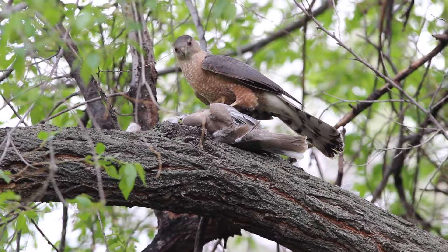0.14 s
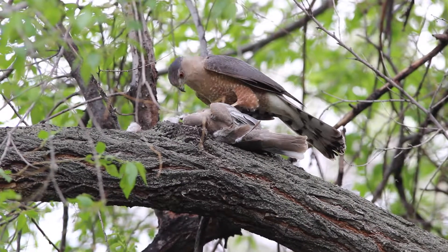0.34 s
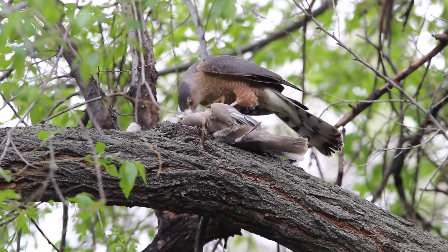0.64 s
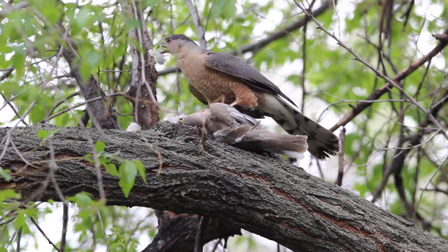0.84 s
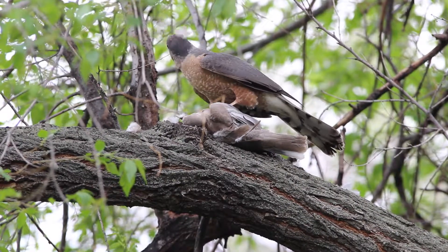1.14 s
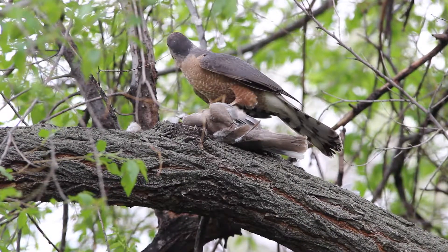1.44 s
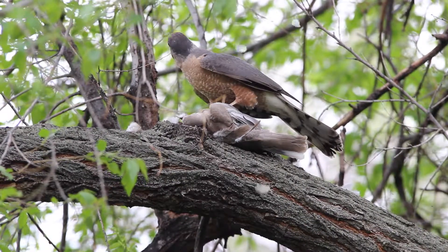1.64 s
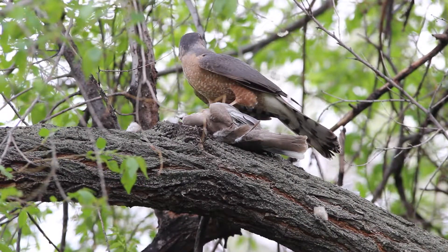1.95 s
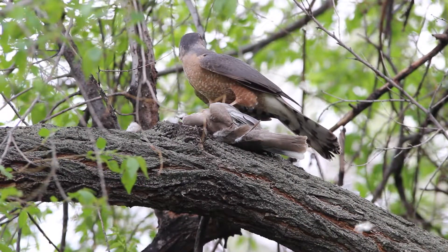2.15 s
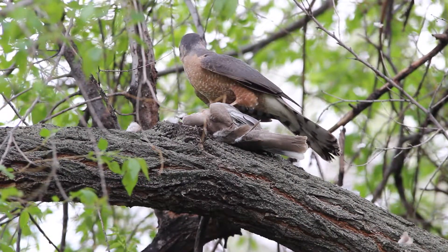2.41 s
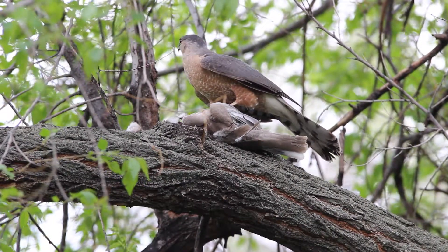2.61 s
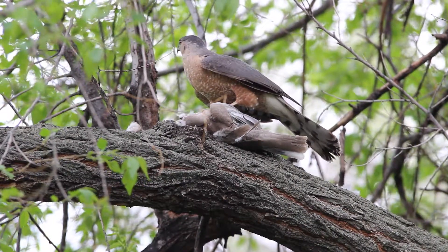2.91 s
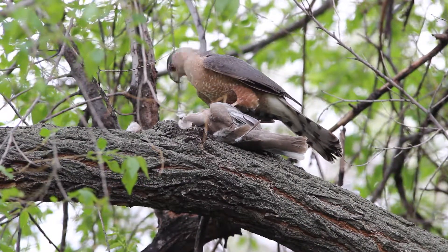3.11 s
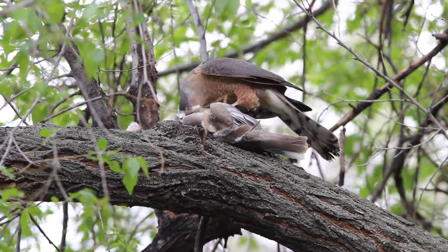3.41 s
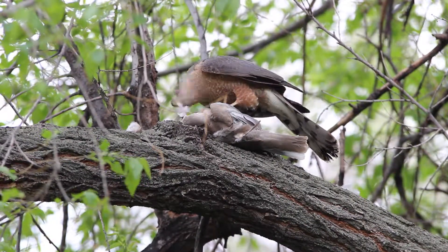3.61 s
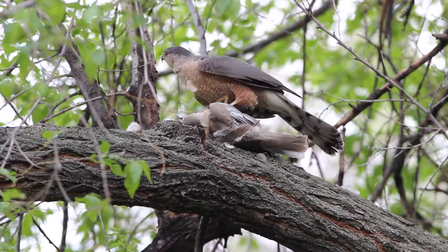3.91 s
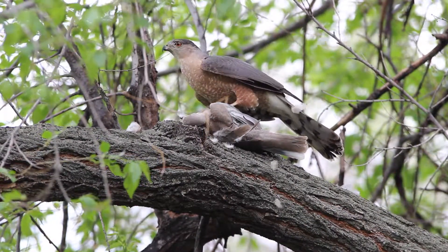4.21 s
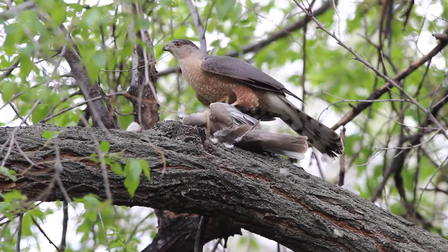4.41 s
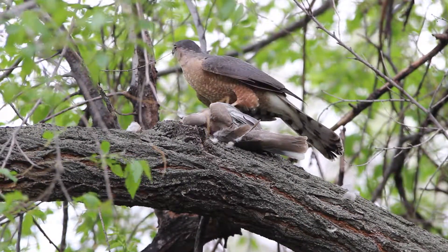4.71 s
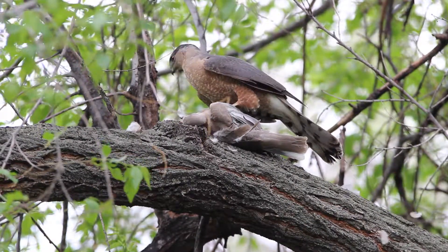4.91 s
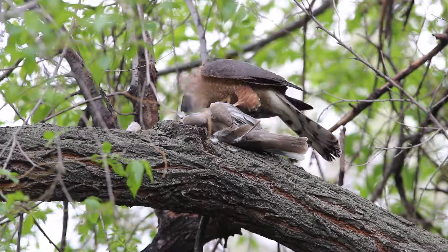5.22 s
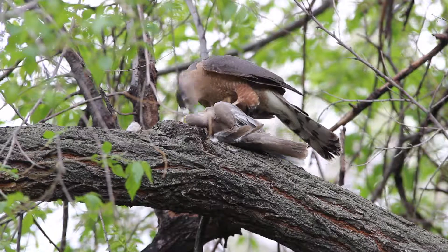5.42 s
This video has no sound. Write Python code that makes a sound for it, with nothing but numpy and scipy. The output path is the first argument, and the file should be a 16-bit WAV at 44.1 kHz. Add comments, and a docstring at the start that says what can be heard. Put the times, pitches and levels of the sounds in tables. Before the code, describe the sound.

In a wood, a small bird chirps faintly far off, and a hawk makes a few soft ticks plucking feathers. Then several nearby jays scold with harsh, nasal calls that overlap and break into rasps. They pause for about a second, leaving only distant chirps, then return in a denser bout, ending with the loudest call. A faint, low town rumble continues underneath.

```python
"""In a wood, several jays scold a hawk from the trees, their harsh calls overlapping in bouts.
Each call scoops up, holds a nasal tone, sags and breaks into a rasp as the syrinx passes through
period doubling into chaos; throat and bill filter it. A small bird chirps far off and the hawk
plucks its prey. Leaves and trunks scatter these sounds into echoes, over a low, distant town rumble."""
import sys
import numpy as np
from scipy import signal
from scipy.fft import rfft, irfft, next_fast_len
from scipy.io import wavfile
from scipy.ndimage import map_coordinates

SR = 44100
rng = np.random.default_rng(int(sys.argv[2]) if len(sys.argv) > 2 else 0)


def int16_out(signal):
    """Quantize to a 16-bit WAV file."""
    q = np.round(np.clip(np.atleast_2d(signal).T, -1, 1) * 32767)
    wavfile.write(sys.argv[1], SR, q.astype(np.int16))


N = 244752

# Spectrum of the distant town and the leaves. Each row: frequency in Hz, relative density in dB.
BACKGROUND_SPECTRUM = [(15, -53), (25, -23), (58, -3), (107, 0), (178, -2), (267, -6.5), (523, -5),
                       (598, -6), (895, -5.5), (1270, -10.5), (1450, -15), (2120, -24.5), (2850, -27),
                       (6730, -37), (15500, -40.5)]
# The far songbird. Each row: start in seconds, length in seconds, first pitch in Hz,
# last pitch in Hz, source level in dB.
SONGBIRD_CHIRPS = [(.16, .007, 6040, 5050, -47), (.258, .042, 4450, 3950, -52),
                   (0.253, 0.04, 3900, 2850, -50.5), (0.294, .07, 2090, 2450, -54.5),
                   (0.357, 0.047, 3900, 2840, -51.5), (0.84, 0.066, 3200, 3290, -54),
                   (0.914, 0.059, 3060, 2830, -54), (2.999, 0.028, 3840, 2620, -37),
                   (3.397, 0.045, 4800, 3350, -49), (3.47, 0.048, 3030, 2640, -49.5),
                   (3.87, .05, 4100, 2700, -52), (3.934, .08, 2970, 2680, -50)]
# The hawk's bill tugging at feathers. Each row: start in seconds, level before filtering in dB.
FEATHER_TUGS = [(0.196, -49), (0.634, -47), (.918, -53), (1.208, -50), (1.26, -50)]
# The jays' calls. Each row: start, length and time to the crest in seconds, crest and final pitch in Hz,
# exponent of the sag (1 is straight), tone level at the crest before filtering in dB, its change by the
# end in dB, roughness of the held tone (0-1), rasp level in dB, raspy share of the call (0-1),
# treble gain in dB as the bird faces towards or away.
JAY_CALLS = [ (1.578, .340, 0.05, 1603, 1420, .92, -15.5, -8, .025, -21, 0.53, -1),
             (1.613, 0.37, 0.072, 1596, 1420, 1.2, -10.5, -6, .025, -18.5, 0.42, -2),
             (2.116, 0.31, 0.024, 1621, 1472, 0.87, -11.5, -1, 0, -22.5, 0.3, -1.5),
             (2.35, .370, 0.06, 1614, 1400, 1.25, -12, -2.5, 0.05, -24.5, 0.33, 2),
             (2.411, 0.32, 0.071, 1652, 1420, 1.28, -23.5, 3, 0.02, -27.5, 0.52, 0.5),
             (2.653, 0.3, .035, 1617, 1475, 1.26, -11, -3.5, .02, -19, 0.49, -3.5),
             (4.122, 0.36, 0.086, 1537, 1405, 1.96, -19, -6, .02, -24.5, .50, 4.5),
             (4.195, 0.35, .057, 1617, 1340, 1.85, -11, -5, .015, -22.5, 0.35, 5),
             (4.512, 0.28, 0.044, 1595, 1435, 0.97, -20, 4, 0.03, -20, 0.42, -3.5),
             (4.674, .320, .056, 1563, 1370, 1.6, -19, -2.5, 0.06, -27.5, 0.47, 1),
             (4.846, 0.38, .068, 1664, 1490, 1.15, -14.5, -13, 0.13, -28, 0.22, -6),
             (5.009, 0.35, .062, 1605, 1270, 1.59, -11.5, -3, .02, -17.5, 0.47, 3),
             (5.039, 0.31, 0.067, 1647, 1440, 1.2, -18.5, -14, 0.03, -22, 0.48, -1),
             (5.343, .350, 0.08, 1575, 1275, 1.5, -20.5, 0, 0.02, -20, .35, 2),
             (5.419, .350, 0.086, 1658, 1420, 1.2, -13.5, 17, 0.08, -15, .35, -5.5), ]
# Response of the throat while the bill is still opening. Each row: frequency in Hz, gain in dB.
OPENING_BILL_RESPONSE = [(1200, -30), (2350, -17), (3200, -16.5), (4100, -20.5), (4750, 1), (5400, -18),
                         (6200, -12.5), (7200, -20), (9000, -34), (15500, -34)]
# Response of the throat and open bill. Each row: frequency in Hz, gain in dB.
OPEN_BILL_RESPONSE = [(800, -40.5), (1550, -27.5), (2350, -23.5), (2750, -13), (3000, -1.5), (3250, -3.5),
                      (3800, -24), (4750, -19), (5500, -26.5), (6300, -25.5), (7100, -25), (8600, -34.5),
                      (12000, -40.5), (15500, -50)]
# Spectrum of the rasp. Each row: frequency in Hz, relative density in dB.
RASP_SPECTRUM = [(800, -67), (1400, -12), (1950, -19), (2300, -7.5), (2550, -11), (2800, 0), (3200, -5.5),
                 (3600, 3), (4900, -10), (6500, -7.5), (7800, -18), (9900, -26), (12600, -24), (15500, -43)]
# Scatter from leaves, trunks and the deep wood. Each row: level before filtering in dB,
# time to decay by 60 dB in seconds, low-pass cutoff in Hz.
SCATTER_LAYERS = [(-10, 0.31, 10700), (-15, 0.54, 7400), (-27, 1.9, 3320)]

BACKGROUND_DB, TOP_HZ = -38.5, 15800
CLIMB_HZ_PER_S2, SWELL_DB = 16070, 5.5  # parabolic rise of a call to its crest
ONSET_ROUGHNESS, CLEARING_S = 0.19, 0.018
BREAK_SHARE, BREAK_POWER = 0.69, 1.36  # share of the raspy part taken to break up fully; its steepening


def undb(db):
    """Amplitude ratio of a level in decibels."""
    return 10 ** (np.asarray(db) / 20)


def unit_rms(x):
    """Normalisation to an rms of 1."""
    return x / np.sqrt(np.mean(x ** 2))


def gain_at(hz, spectrum):
    """Gain of a (Hz, dB) spectrum, interpolated on a log-frequency axis."""
    points, db = np.transpose(spectrum)
    return undb(np.interp(np.log(np.maximum(hz, 1)), np.log(points), db))


def filtered(x, spectrum):
    """Zero-phase filtering by a (Hz, dB) spectrum."""
    size = next_fast_len(len(x))
    return irfft(rfft(x, size) * gain_at(np.fft.rfftfreq(size, 1 / SR), spectrum), size)[:len(x)]


def drift(size, rate):
    """Smooth random modulation of spread near 1, through `rate` knots a second."""
    knots = rng.standard_normal(4096)
    return map_coordinates(knots, [np.arange(size) * rate / SR], order=3, mode="wrap")


def add(track, start, x):
    """Superposition of x on the track from a start in seconds."""
    i = max(int(start * SR), 0)
    track[i:i + len(x)] += x[:max(N - i, 0)]


def town_and_leaves(swell_db=0.45, flutter_db=1.0):
    """Broadband noise, lightly modulated in amplitude: a far rumble and a faint hiss of leaves."""
    noise = unit_rms(filtered(rng.standard_normal(N), BACKGROUND_SPECTRUM))
    return noise * undb(BACKGROUND_DB + swell_db * drift(N, 1.14) + flutter_db * drift(N, 14))


def songbird(waver=0.014):
    """Frequency modulation: each thin whistle is a sinusoid on a wavering exponential glide."""
    out = np.zeros(N)
    for start, length, from_hz, to_hz, db in SONGBIRD_CHIRPS:
        size = int(length * SR)
        hz = np.geomspace(from_hz, to_hz, size) * (1 + waver * drift(size, 157))
        whistle = np.sqrt(2) * np.sin(2 * np.pi * np.cumsum(hz) / SR)
        add(out, start, undb(db) * signal.windows.tukey(size, .5) * whistle)
    return out


def wood_echoes(x, build_s=0.0044):
    """Reverberation by scattering from trees: each layer is fainter, longer and duller than the last."""
    t = np.arange(SR) / SR
    response = 0
    for db, t60, cutoff_hz in SCATTER_LAYERS:
        tail = rng.standard_normal(SR) * np.exp(-np.log(1000) * t / t60) * np.minimum(t / build_s, 1)
        lowpass = signal.butter(1, cutoff_hz, fs=SR, output="sos")
        response = response + undb(db) * signal.sosfilt(lowpass, unit_rms(tail) / np.sqrt(SR))
    return signal.fftconvolve(x, response)[:N]


def hawk_plucks(decay_s=.009, band_hz=(2000, 11000)):
    """Damped transients: each rip of feathers is a burst of band-limited noise."""
    out, t = np.zeros(N), np.arange(SR // 10) / SR
    for start, db in FEATHER_TUGS:
        add(out, start, undb(db) * np.exp(-t / decay_s) * rng.standard_normal(len(t)))
    return signal.sosfilt(signal.butter(1, band_hz, "band", fs=SR, output="sos"), out)


def call_contours(t, length, crest_s, crest_hz, final_hz, bend, crest_db, change_db, held_rough, raspy):
    """Vocal effort sets pitch, level and roughness: a call climbs to a crest, sags and breaks up."""
    to_crest = np.maximum(crest_s - t, 0)
    spent = np.maximum(t - crest_s, 0) / (length - crest_s)
    hz = crest_hz - CLIMB_HZ_PER_S2 * to_crest ** 2 - (crest_hz - final_hz) * spent ** bend
    db = crest_db - SWELL_DB * (to_crest / crest_s) ** 2 + change_db * spent
    broken = np.clip((t / length - 1 + raspy) / (raspy * BREAK_SHARE), 0, 1) ** BREAK_POWER
    rough = np.clip(held_rough + ONSET_ROUGHNESS * np.exp(-t / CLEARING_S) + broken, 0, 1)
    return hz, db, rough


def nasal_tone(t, hz, phase, db, rough, opening, split_s=0.012, hoarse=0.16, flicker_db=3.0,
               overtone_slope=0.31, full_db=-14, quarter_db=-7,
               shrill_hz=4780, shrill_width_hz=300, shrill_db=5, shrill_s=0.04):
    """Source and filter: throat and bill resonances weight the partials of a period-doubled syrinx."""
    opened = 1 - opening
    # softer calls lose more of the main resonance than of their overtones
    overtones = undb(overtone_slope * (full_db - db))
    doubling = 1 - np.exp(-(t / split_s) ** 2)
    tone = 0
    for k in np.arange(1, 25):  # multiples of half the pitch
        partial_hz = hz * k / 2
        gain = gain_at(partial_hz, OPEN_BILL_RESPONSE) ** opened
        gain *= gain_at(partial_hz, OPENING_BILL_RESPONSE) ** opening
        # a shrill upper resonance stands out while the bill is widest
        shrill = np.exp(-(t / shrill_s) ** 2 - ((partial_hz - shrill_hz) / shrill_width_hz) ** 2)
        gain *= undb(shrill_db * opened * shrill)
        offset = 2 * np.pi * rng.random()
        if k != 4:  # away from the main resonance the partials flicker and turn hoarse
            gain *= (overtones * undb(flicker_db * drift(len(t), 30.1))) ** opened
            offset += hoarse * k * np.sqrt(rough) * drift(len(t), 450)
        tone += gain * np.sin(phase * k / 2 + offset) * (doubling if k % 2 else 1)
    # a second doubling adds quarter-pitch sidebands as the tone breaks
    return np.sqrt(2) * tone * (1 + undb(quarter_db) * np.sqrt(rough) * np.cos(phase / 4))


def membrane_rasp(phase, pulsing=0.76, sputter_db=-2.0, swing=3.0):
    """Chaotic vibration: the membranes' uneven slaps are noise pulsed at half pitch, limited in swing."""
    slaps = rng.standard_normal(len(phase)) * (1 + pulsing * np.cos(phase / 2))
    slaps *= undb(sputter_db * drift(len(phase), 350))
    rasp = unit_rms(filtered(slaps, RASP_SPECTRUM))
    envelope = np.abs(signal.hilbert(rasp))
    return unit_rms(rasp / np.sqrt(1 + (envelope / swing) ** 2))


def jay_call(length, crest_s, crest_hz, final_hz, bend, crest_db, change_db, held_rough, rasp_db, raspy,
             scoop=.23, scoop_s=.012, opening_s=0.022, attack_s=0.0023, release_s=0.0058,
             waver=0.0021, tremble=0.0043, jitter=.028, crack=.02, breakup=0.83):
    """Nonlinear oscillation: the syrinx slides up to pitch, doubles its period twice and turns chaotic."""
    t = np.arange(int(length * SR)) / SR
    hz, db, rough = call_contours(t, length, crest_s, crest_hz, final_hz, bend,
                                  crest_db, change_db, held_rough, raspy)
    opening = np.exp(-(t / opening_s) ** 2)  # falls from 1 to 0 as the bill opens
    hz *= 1 - scoop * np.exp(-(t / scoop_s) ** 2)
    # uneven cycles crack the onset and blur the high overtones first
    unevenness = tremble + jitter * rough + crack * opening
    hz *= 1 + waver * drift(len(t), 121.1) + unevenness * drift(len(t), 1100)
    phase = 2 * np.pi * np.cumsum(hz) / SR
    tone = undb(db) * np.sqrt(1 - breakup * rough ** 2) * nasal_tone(t, hz, phase, db, rough, opening)
    rasp = undb(rasp_db) * rough * membrane_rasp(phase)
    return (tone + rasp) * np.minimum(t / attack_s, 1) * np.minimum((t[-1] - t) / release_s, 1)


def branch_reflections(x, count=3, gain_db=-10, longest_delay_s=.005, above_hz=4970):
    """Comb filtering: treble glancing off branches makes overtones swell and fade as the pitch slides."""
    treble = signal.sosfilt(signal.butter(4, above_hz, "high", fs=SR, output="sos"), x)
    lags = (rng.random(count) * longest_delay_s * SR).astype(int)
    return x + undb(gain_db) * sum(np.pad(treble, (lag, 0))[:len(x)] for lag in lags)


def jays(beam_from_hz=4500, beam_full_hz=10000):
    """Directivity: an open bill beams treble forward, so each call is as bright as its bird's aim."""
    out = np.zeros(N)
    for start, *call, treble_db in JAY_CALLS:
        beamed = filtered(jay_call(*call), [(beam_from_hz, 0), (beam_full_hz, treble_db)])
        add(out, start, branch_reflections(beamed))
    return out


def scene(far_direct_db=-4, far_echo_db=7):
    """Direct-to-reverberant ratio falls with distance: jays and hawk are near, the songbird far."""
    near, far = jays() + hawk_plucks(), songbird()
    direct = near + undb(far_direct_db) * far
    echoes = wood_echoes(near + undb(far_echo_db) * far)
    return (direct + echoes + town_and_leaves())[None]


def record(dry):
    """Band limiting: a steep low-pass filter cuts the top of the treble."""
    return signal.sosfilt(signal.ellip(10, .2, 80, TOP_HZ, fs=SR, output="sos"), dry)


dry = scene()
out = record(dry)
int16_out(out)
```